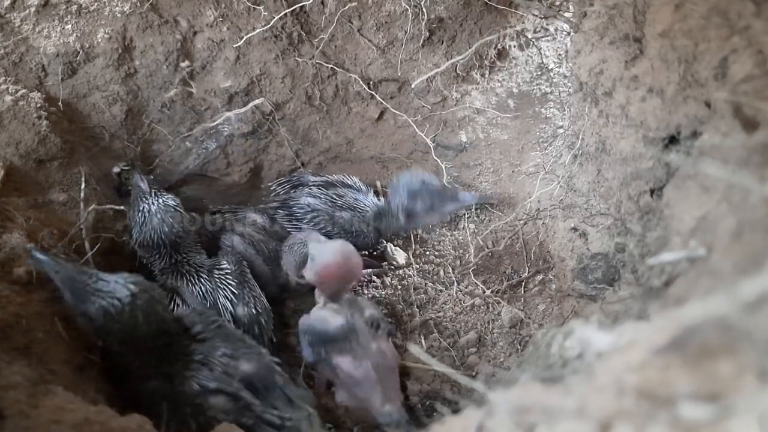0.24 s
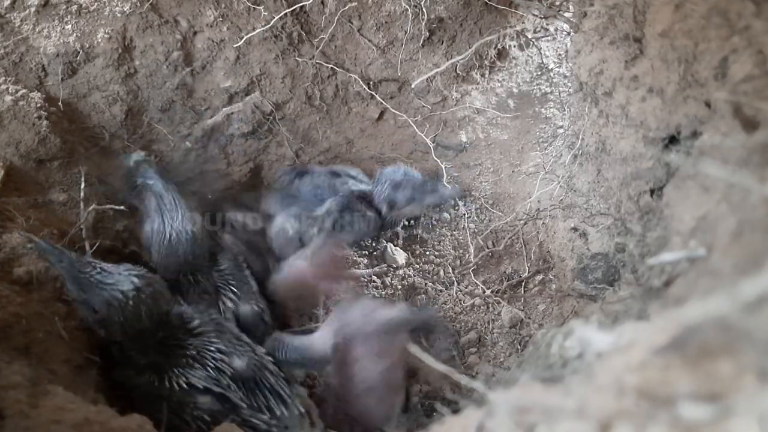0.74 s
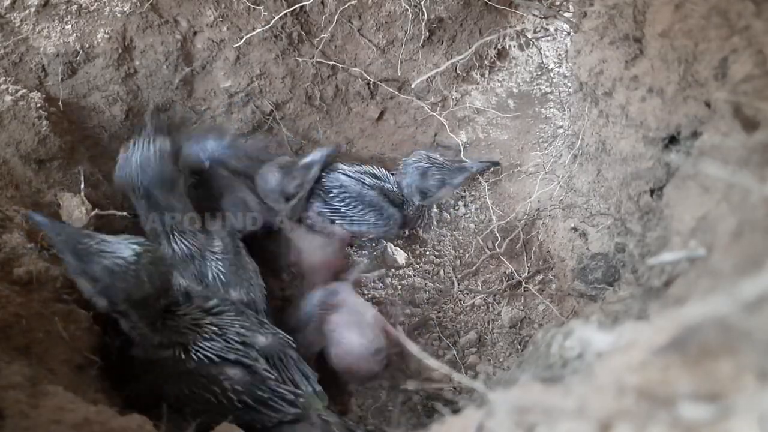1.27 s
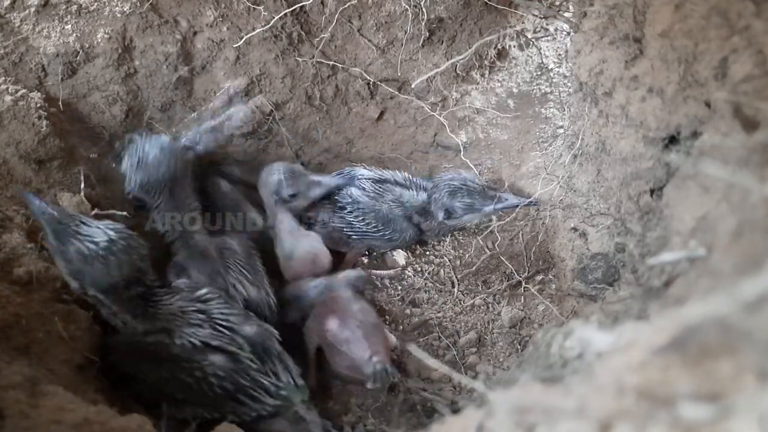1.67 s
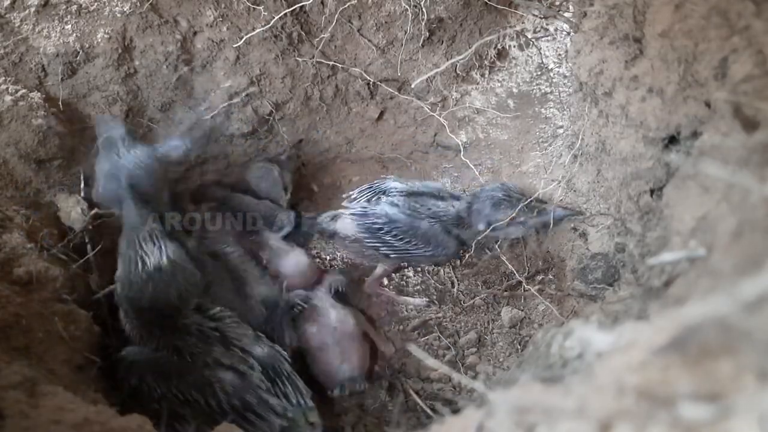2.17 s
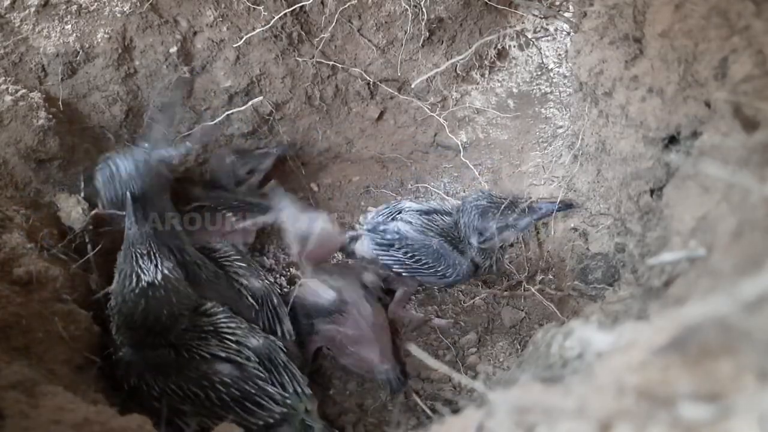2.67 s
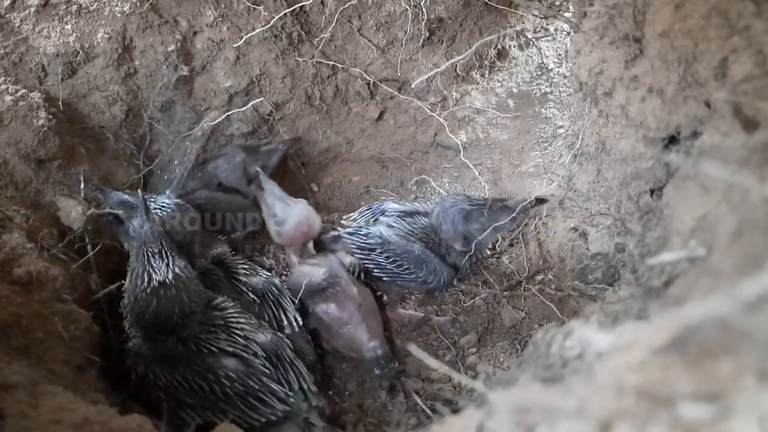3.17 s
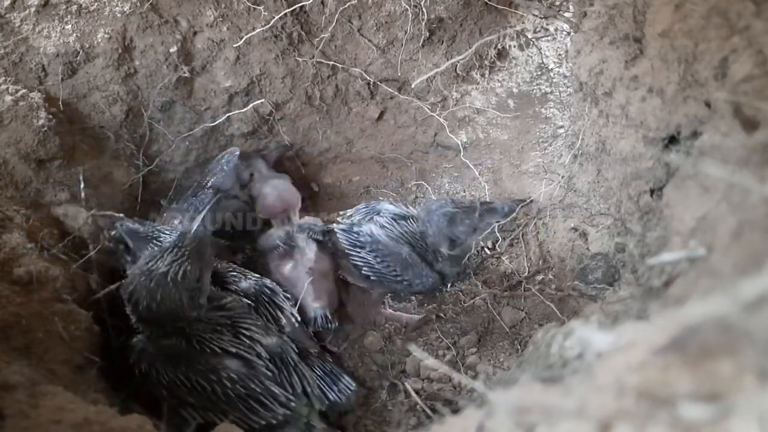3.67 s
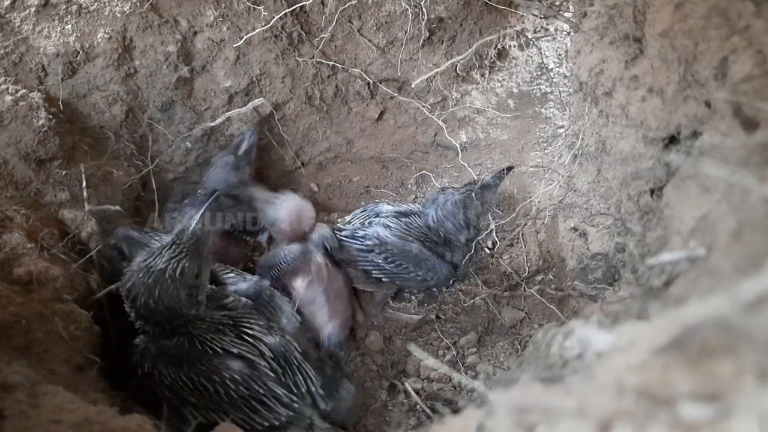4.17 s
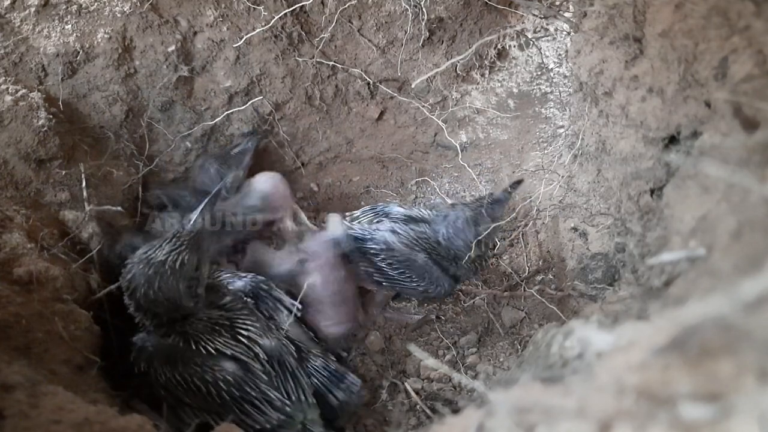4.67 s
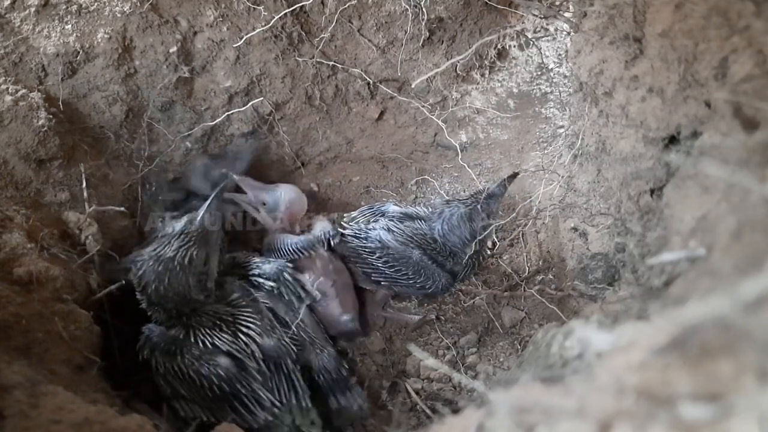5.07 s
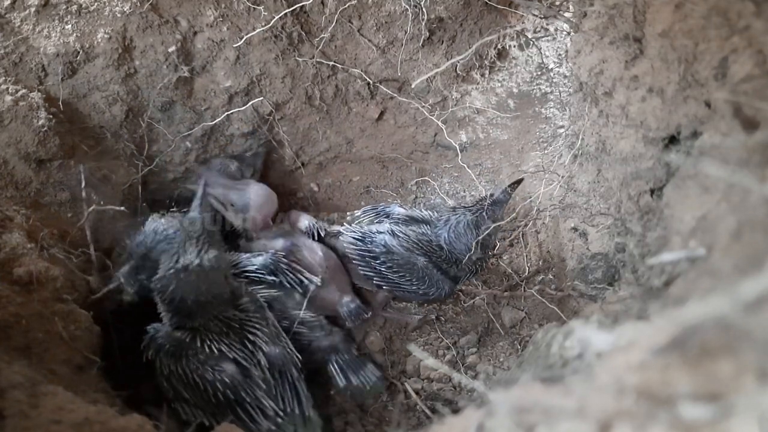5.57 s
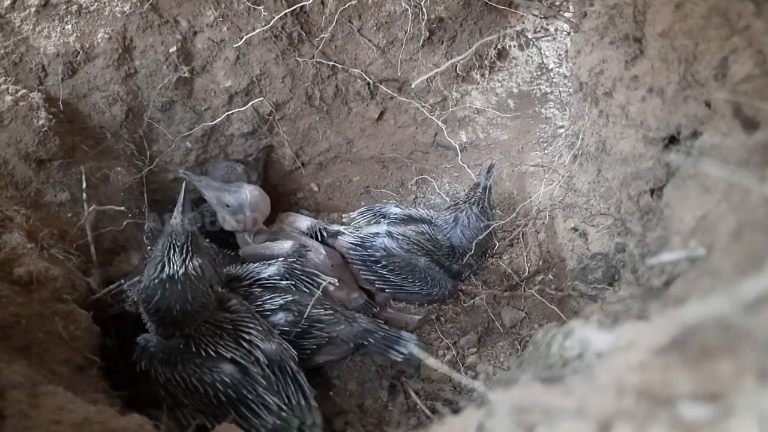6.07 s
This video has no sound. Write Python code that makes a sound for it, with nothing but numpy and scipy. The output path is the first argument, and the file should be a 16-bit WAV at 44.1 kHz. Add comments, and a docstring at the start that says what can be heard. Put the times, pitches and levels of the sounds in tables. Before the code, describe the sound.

A far motor's low hum and a faint hiss run steadily. About a second in, nestlings close by and slightly left start calling: short, arching chirps that sink into quick, rasping trills, overlapping and loudest near the end. Under the calls come gritty scuffles in dry dirt and occasional small claw or beak ticks. The earth walls of the burrow add a very short echo.

```python
"""Over a far motor's hum and a faint hiss, bee-eater chicks scuffle and beg, close by and a little left.
Each call is a chirp that arches up and down, then sinks into a fluttering, rasping trill.
The flutter comes from the syrinx, a bird's voice box; one voice is full, another thin and shrill.
Dry soil grates as the chicks push about, and the earth walls of their burrow add short echoes."""
import sys
import numpy as np
from scipy import signal
from scipy.fft import rfft, irfft, next_fast_len
from scipy.io import wavfile

SR = 44100
rng = np.random.default_rng(int(sys.argv[2]) if len(sys.argv) > 2 else 0)


def unload_wav(signal):
    """Save mono or channel-first audio to the path in sys.argv[1] as 16-bit WAV at rate SR, clipped to [-1, 1]."""
    wavfile.write(
        sys.argv[1],
        SR,
        np.round(np.clip(np.atleast_2d(signal).T, -1, 1) * 32767).astype(np.int16),
    )


N = 279153
TIME = np.arange(N) / SR
EAR_LAG_S = 0.0002   # the voices reach the right side this much later
CHIRP_START_HZ, CHIRP_END_HZ, PEEP_FOOT_HZ = 2816, 2570, 2570   # all near the pitch of the trills

# Arched chirps (harmonics are tones at 1, 2, 3... times the pitch): start_s, top_s, end_s, top_hz,
# swell_half_width_s, harmonic1_db, harmonic2_db, harmonic3_db, roughness (0 to 1), pan_db
CHIRP_NOTES = [(0.921, 0.935, .972, 2980, 0.032, -47.5, -49.5, -58, 0.5, 12),
               (1.2, 1.224, 1.29, 4055, 0.064, -40.5, -30, -40.5, .35, 8.3),
               (1.27, 1.295, 1.318, 3480, .013, -33.5, -45.5, -54, 0, 13),
               (1.542, 1.567, 1.6, 3610, 0.015, -35.5, -24, -39.5, 0.07, 7.9),
               (1.688, 1.721, 1.754, 3840, 0.03, -31, -40, -45, 0.1, 7.8),
               (1.843, 1.864, 1.894, 3540, 0.02, -35.5, -27, -32.5, 0, 8),
               (2.144, 2.162, 2.201, 3530, 0.0097, -32, -24, -37, .03, 10.6),
               (2.28, 2.308, 2.342, 3750, 0.035, -32, -50, -66, 0.1, 11),
               (2.434, 2.465, 2.492, 3450, 0.013, -33.5, -28.5, -47, 0, 8.2),
               (2.68, 2.712, 2.744, 3800, 0.036, -33.5, -60, -70, 0.2, 11),
               (2.697, 2.733, 2.769, 3650, 0.034, -31.5, -48.5, -68, 0.28, 7.6),
               (3.009, 3.03, 3.061, 3856, .012, -21.5, -43, -68, 0, 5.7),
               (3.289, 3.312, 3.337, 3510, 0.018, -32.5, -42, -71, 0.65, 11),
               (3.296, 3.32, 3.353, 3576, 0.012, -37, -17.5, -53, 0.33, 6.2),
               (3.651, 3.671, 3.705, 3280, 0.025, -33.5, -57, -87, 0.3, 8.9),
               (3.998, 4.018, 4.04, 3260, 0.02, -30, -49, -69, 0.7, 7.9),
               (4.066, 4.092, 4.124, 3460, 0.063, -32.5, -41, -64, 0.55, 2.7),
               (4.383, 4.409, 4.439, 3746, .009, -37, -17.3, -46, 0.64, 11),
               (4.491, 4.51, 4.528, 3380, .028, -29, -45, -59, 1, 7),
               (4.537, 4.535, 4.604, 4140, 0.12, -32.5, -55, -54, 0.58, 19),
               (4.662, 4.686, 4.715, 3260, 0.029, -37, -38, -35, 0.44, 12),
               (4.988, 5.018, 5.047, 3710, 0.0084, -34.5, -20.5, -48.5, 0.66, 12),
               (5.299, 5.336, 5.365, 3836, 0.0092, -30, -33.5, -58, 0, 15),
               (5.315, 5.333, 5.368, 3510, 0.033, -28.5, -37, -37.5, 0.1, 9.5),
               (5.631, 5.653, 5.687, 3330, 0.025, -25, -31.5, -51.5, 0.85, 6.5),
               (5.914, 5.938, 5.961, 3530, 0.039, -23.5, -46, -70, 0.18, 8),
               (5.966, 5.989, 6.02, 3550, 0.032, -23, -45, -68, 0.15, 8.8),
               (6.264, 6.292, 6.331, 3420, 0.036, -22, -43, -63, 0.67, 12)]
# Full voice: start_s, end_s, pitch_hz, flutter_depth, sag (share of pitch), tone_db, rasp_db, growth_db
FULL_TRILL_NOTES = [(0.963, 1.182, 2435, 0.4, 0.049, -47, -68, 0.5),
                    (1.312, 1.471, 2550, 0.77, 0.034, -39.5, -60, -16),
                    (1.743, 1.946, 2706, 0.56, 0.01, -36.5, -38.5, -0.5),
                    (1.941, 2.02, 2630, 0.42, 0.13, -28, -49, -2),
                    (2.331, 2.522, 2517, 0.88, 0.0013, -35, -36, -2),
                    (2.737, 3.24, 2690, 0.95, 0.0049, -43, -35, 0),
                    (3.329, 3.597, 2530, .65, 0.037, -36.5, -40, -6),
                    (3.687, 3.935, 2485, 1.1, 0.013, -37, -47.5, -4),
                    (4.036, 4.102, 2224, 0.36, 0, -37.5, -48.5, -9),
                    (4.586, 4.852, 2717, 1.15, .02, -35.5, -38, -3),
                    (5.358, 5.877, 2518, .8, 0.031, -29.5, -36, 0.5),
                    (5.957, 6.227, 2476, 0.83, 0.0027, -29, -41, -0.5)]
# Thin voice: start_s, end_s, pitch_hz, flutter_depth, harmonic2_db, harmonic3_db, growth_db, accent_db
THIN_TRILL_NOTES = [(.965, 1.174, 2486, 0.55, -58, -80, 3, 0),
                    (1.282, 1.475, 2840, 0.9, -44.5, -47.5, -4, -14),
                    (1.598, 1.77, 2744, 0.94, -44.5, -40, -8.5, 12.5),
                    (1.891, 2.063, 2650, 0.65, -43, -56, 34, -8),
                    (2.201, 2.363, 2630, 1.05, -46.5, -39, 10.5, -4),
                    (2.486, 2.628, 2660, 1.08, -45, -58, 5, -6),
                    (2.771, 2.934, 2600, 0.76, -50.5, -55, -2, -3),
                    (3.061, 3.219, 2650, 0.9, -42, -47.5, 9, 12.5),
                    (3.347, 3.478, 2666, .8, -47.5, -34, 2, -8),
                    (4.117, 4.309, 2740, 1.11, -51, -44, 6.5, 11),
                    (4.436, 4.588, 2820, 0.9, -48, -32.5, -7.5, -4),
                    (4.718, 4.911, 2560, 0.86, -51.5, -53, -10, 8),
                    (5.048, 5.234, 2690, 0.8, -48.5, -34.5, 7.5, 4),
                    (5.368, 5.552, 2720, 1, -47.5, -33, 0, -2), (5.681, 5.853, 2580, .8, -45, -65, -17, 13),
                    (6.017, 6.195, 2560, 0.95, -46.5, -56, -11, 2)]
# Squeaks as the shrill voice breaks into a chirp: start_s, level_db
SQUEAK_NOTES = [(1.534, -37), (1.836, -41), (2.139, -31), (3.291, -31), (4.378, -27)]
# Soft peeps between calls: start_s, end_s, top_hz, harmonic1_db, harmonic2_db
PEEP_NOTES = [(.005, 0.103, 2690, -63.5, -74), (1.785, 1.822, 2900, -48, -49),
              (2.092, 2.126, 2980, -47, -45.5), (2.651, 2.684, 2970, -39, -44.5),
              (2.949, 3.023, 3000, -43, -54), (3.234, 3.289, 3730, -53, -47),
              (3.598, 3.647, 3780, -47.5, -65), (3.94, 3.996, 3590, -47.5, -63),
              (4.933, 4.976, 2820, -49, -70), (5.856, 5.909, 3690, -37, -54),
              (6.228, 6.271, 3510, -42, -54.5)]
# Tone colour of a chick's rasp: frequency_hz, level_db
RASP_COLOUR = [(400, -26.5), (750, -38.5), (1000, -10.5), (1200, -7.5), (1750, -1), (2300, -3.5),
               (2900, -3.5), (3700, -17), (5000, -30), (8000, -75)]
# Tone colour of the air hissing in a chirp: frequency_hz, level_db
BREATH_COLOUR = [(1500, -25), (3500, -4), (6000, -17), (8500, 15), (11000, -15), (15500, -11)]
# Pushes against dry soil: start_s, length_s, level_db
SOIL_PUSHES = [(0, 0.11, -62), (0.736, 0.12, -59.5), (0.885, 0.33, -53.5), (1.213, 0.35, -44),
               (1.556, 0.31, -43.5), (1.827, 0.28, -39), (2.154, 0.3, -47), (2.452, 0.34, -49.5),
               (3.027, 0.29, -51.5), (3.458, 0.26, -52.5), (4.036, 0.11, -43.5), (4.2, 0.18, -43),
               (4.43, 0.28, -46.5), (4.672, 0.29, -46), (5.03, 0.39, -44), (5.477, 0.39, -50.5),
               (5.86, 0.21, -53.5), (6.27, .06, -58)]
# Ticks of claws and beaks: start_s, level_db
CLAW_AND_BEAK_TICKS = [(.909, -33.5), (1.012, -39), (1.0269, -30), (1.117, -41), (1.5035, -45),
                       (1.626, -28), (2.145, -32), (2.688, -42), (3.6433, -37), (4.005, -48),
                       (4.193, -26.5), (5.6308, -30)]
# Tone colour of grating soil: frequency_hz, level_db
SOIL_COLOUR = [(400, -13.5), (1000, 2.5), (2000, 3.5), (4000, 2.5), (6000, 4.5), (8000, 14), (10000, -3),
               (11300, -5), (12800, 5.5), (15500, -2.5)]
# The motor's humming tones: pitch_hz, level_db
MOTOR_TONES = [(75.6, -41.5), (151.2, -45.5), (226.8, -56.5)]
# Tone colour of the low rumble: frequency_hz, level_db
RUMBLE_COLOUR = [(22, -34), (40, -5), (52, -2.5), (70, -8.5), (100, 2.5), (135, -5.5), (180, -4),
                 (245, -4.5), (360, -22.5), (500, -30), (800, -34), (1500, -41), (4000, -54.5)]
# How alike the rumble is left and right: frequency_hz, likeness (0 to 1)
RUMBLE_STEREO = [(30, 0.61), (80, 0.64), (280, 0.78), (640, 0.085), (1400, 0), (16000, 0)]
# Tone colour of the background hiss: frequency_hz, level_db
HISS_COLOUR = [(1760, -82), (3000, -13), (3380, -35), (4340, -17.5), (5090, 4.5), (5380, -6.5), (5850, 7),
               (6450, 1.5), (8690, -1), (9320, -52), (10100, -40), (11700, -25.5), (15800, -30)]


def chirps(fade_s=.0026, rough_waver=.06, ripple_db=2.8, air_db=-16, rasp_db=-20):
    """The pitch arches up and down; at the top the forced voice swells and can turn rough."""
    out, air, rasp = np.zeros((2, N)), np.zeros((2, N)), np.zeros((1, N))
    floors = (.28, .09, .6, .6)   # each harmonic's strength outside the swell
    for start, top, end, top_hz, width, *levels_db, rough, pan_db in CHIRP_NOTES:
        t, gate = span(start - fade_s / 2, end + fade_s / 2, fade_s)
        rising = np.clip((t - start) / max(top - start, .001), 0, 1)
        falling = np.clip((t - top) / (end - top), 0, 1)
        rise_hz = CHIRP_START_HZ + (top_hz - CHIRP_START_HZ) * np.sin(np.pi / 2 * rising)
        fall_hz = CHIRP_END_HZ + (top_hz - CHIRP_END_HZ) * np.cos(np.pi / 2 * falling) ** 2
        swell = np.exp(-np.abs((t - top) / width) ** 2.95)
        jitter = 0.0037 * drift(422, len(t)) + 0.014 * drift(4000, len(t))
        jitter += rough * rough_waver * swell * drift(2000, len(t))
        hz = np.where(t < top, rise_hz, fall_hz) * (1 + jitter)
        high_pan_db = pan_db + 5   # higher harmonics sound further left
        fourth_db = levels_db[-1] - 2
        for k, (level_db, floor) in enumerate(zip(levels_db + [fourth_db], floors), 1):
            shape = unit_power(gate * (floor + swell) * from_db(ripple_db * drift(234.6, len(t))))
            fray = 0.038 * (k > 2) * drift(3000, len(t))   # the top harmonics blur into hiss
            tone = whistle(k * hz * (1 + fray), high_pan_db if k > 1 else pan_db)
            add(out, t, from_db(level_db) * shape * tone)
        # shriller chirps let out more air; rougher ones rasp more
        add(air, t, from_db(levels_db[-1] + air_db) * gate * pan(high_pan_db))
        add(rasp, t, from_db(levels_db[0] + rasp_db) * rough * gate * swell)
    return out + air * noise(BREATH_COLOUR) + rasp * rasp_noise(pan_db=8.5)


def full_trills(pan_db=5.5, octave_db=-23, uneven_db=2.5, rattle_db=1.5, rasp_fade_s=.018):
    """The full voice: a throbbing tone, with a rasp that bursts out between throbs and clears at last."""
    out, bursts = np.zeros((2, N)), np.zeros((1, N))
    for start, end, pitch_hz, depth, sag, tone_db, rasp_db, growth_db in FULL_TRILL_NOTES:
        t, gate = span(start, end, fade_s=0.0041)
        effort = gate * from_db(growth_db * np.linspace(-.5, .5, len(t)))
        hz, shut = flutter(t, pitch_hz, depth, sag, rate_hz=114, slide=.33, scatter=0.0417)
        throb = unit_power((1 - shut) * from_db(uneven_db * drift(88.2, len(t))))
        tone = whistle(hz, pan_db) + from_db(octave_db) * whistle(2 * hz, pan_db)
        add(out, t, effort * from_db(tone_db) * throb * tone)
        rattle = unit_power((0.42 + shut) * from_db(rattle_db * drift(250, len(t))))
        add(bursts, t, effort * from_db(rasp_db) * rattle * np.clip((end - t) / rasp_fade_s, 0, 1))
    return out + dip(bursts * rasp_noise(pan_db=7), hz=3300, depth_db=3.5, q=3.7)


def thin_trills(pan_db=9, rasp_db=-12, climb=0.0405, accent_s=0.0062):
    """The thin voice: a small throat favours harmonics 2 and 3, and sounds brighter with effort."""
    out, bursts = np.zeros((2, N)), np.zeros((1, N))
    for start, end, pitch_hz, depth, second_db, third_db, growth_db, accent_db in THIN_TRILL_NOTES:
        t, gate = span(start, end, fade_s=0.0025)
        progress = np.linspace(0, 1, len(t))
        end_accent = np.exp(-((end - t) / accent_s - 1) ** 2)
        effort_db = growth_db * (progress - .5) + accent_db * end_accent
        scatter = 0.037 + 0.074 * progress ** 2   # rougher as the note goes on
        hz, shut = flutter(t, pitch_hz, depth, sag=0.058, rate_hz=98, slide=0.092, scatter=scatter)
        hz = hz * (1 + climb * (progress - .5))
        opening = np.clip(1 - 0.82 * shut, .15, 1)
        throb = gate * unit_power(opening * from_db(1.5 * drift(130.8, len(t))))
        low_db, high_db = second_db + 0.34 * effort_db, third_db + effort_db
        for k, level_db in enumerate((low_db - 4, low_db, high_db, high_db - 27, high_db - 27), 1):
            add(out, t, from_db(level_db) * throb * whistle(k * hz, pan_db))
        add(bursts, t, from_db(high_db + rasp_db) * gate * shut * 2 * np.sqrt(progress))
    return out + bursts * rasp_noise(pan_db)


def flutter(t, pitch_hz, depth, sag, rate_hz, slide, scatter, drop_s=0.00883, clear_s=0.0247):
    """The voice box throbs, each throb sliding down and breaking up. Gives pitch and how shut it is."""
    cycle = np.cumsum(rate_hz * (1 + 0.0633 * drift(60.3, len(t)))) / SR + rng.random()
    depth = depth * np.clip(2 * (t[-1] - t) / clear_s - 1, 0, 1)   # throbbing stops before the end
    shut = np.clip(depth * np.cos(np.pi * cycle) ** 2, 0, 1)
    early_sag = sag * np.sin(np.pi * np.linspace(0, 1, len(t)) ** .7) ** 2
    end_drop = 0.204 * np.exp((t - t[-1]) / drop_s)
    throb_drop = slide * depth * (cycle % 1) ** 3
    jitter = scatter * (0.39 * depth + shut) * drift(1500, len(t)) + 0.0128 * drift(44.43, len(t))
    return pitch_hz * (1 - early_sag - end_drop - throb_drop + jitter), shut


def rasp_noise(pan_db):
    """The low, noisy rasp in a chick's voice."""
    left = noise(RASP_COLOUR)[0]
    right = np.interp(TIME - EAR_LAG_S, TIME, left)
    return np.array([left, right]) * pan(pan_db)


def squeaks(length_s=0.0091, from_hz=4000, to_hz=3430, pan_db=14):
    """The voice breaks in a brief falling squeak, strongest in its second harmonic."""
    out = np.zeros((2, N))
    for start, level_db in SQUEAK_NOTES:
        t, gate = span(start, start + length_s, fade_s=0.0017)
        hz = np.linspace(from_hz, to_hz, len(t)) * (1 + 0.027 * drift(1900, len(t)))
        tone = from_db(-19) * whistle(hz, pan_db) + whistle(2 * hz, pan_db)
        add(out, t, from_db(level_db) * gate * tone)
    return out


def peeps(pan_db=4, waver=0.018):
    """Soft whistles that rise and bend over at the top."""
    out = np.zeros((2, N))
    for start, end, top_hz, *levels_db in PEEP_NOTES:
        t, gate = span(start, end, fade_s=.009)
        arch_hz = top_hz - (top_hz - PEEP_FOOT_HZ) * np.linspace(-1, .6, len(t)) ** 2
        hz = arch_hz * (1 + waver * drift(1200, len(t)))
        for k, level_db in enumerate(levels_db, 1):
            add(out, t, from_db(level_db) * gate * whistle(k * hz, pan_db))
    return out


def scuffle(rest_db=-72, weaken_db=2.5, grain_db=2.5, clump_db=3.5, release_s=0.09, tick_s=0.003):
    """Crumbs of soil grate in clumps each time a chick pushes; now and then a claw or beak ticks."""
    effort, ticks = np.full((1, N), from_db(rest_db)), np.zeros((1, N))
    for start, length, level_db in SOIL_PUSHES:
        t, gate = span(start, start + length, fade_s=0.018)
        release = np.clip((t[-1] - t) / release_s, 0, 1)
        add(effort, t, from_db(level_db - weaken_db * (t - start) / length) * gate * release)
    for start, level_db in CLAW_AND_BEAK_TICKS:
        t, gate = span(start, start + 0.018, fade_s=0.00077)
        add(ticks, t, from_db(level_db) * gate * np.exp((start - t) / tick_s))
    grains = unit_power(from_db(grain_db * drift(900, N) + clump_db * drift(70, N)))
    soil = noise(SOIL_COLOUR) * pan(pan_db=8)
    keep_treble = signal.butter(1, 3500, "high", fs=SR, output="sos")
    return effort * grains * soil + ticks * signal.sosfilt(keep_treble, soil)


def burrow(x, echo_db=-15, die_away_s=.11):
    """Close earth walls return a short, dense smear of echoes."""
    t = TIME[:SR // 8]
    echoes = rng.standard_normal((2, len(t))) * from_db(-60 * t / die_away_s) * (t > .0015)
    echoes /= np.sqrt(np.sum(echoes ** 2, axis=1, keepdims=True))
    return x + from_db(echo_db) * signal.fftconvolve(x, echoes, axes=1)[:, :N]


def motor(waver=0.00584, flicker_db=2.5, rumble_db=-43, rise_db_per_s=0.46):
    """A far motor: three wavering tones slowly grow louder over a steady low rumble."""
    wavering_time = np.cumsum(1 + waver * drift(3.6, N)) / SR
    hum = np.zeros(N)
    for hz, level_db in MOTOR_TONES:
        gain = from_db(level_db + flicker_db * drift(12, N))
        hum += gain * np.sqrt(2) * np.sin(2 * np.pi * (hz * wavering_time + rng.random()))
    hum *= from_db(rise_db_per_s * (TIME - TIME.mean()))
    return hum + from_db(rumble_db) * noise(RUMBLE_COLOUR, RUMBLE_STEREO) * pan(pan_db=2.5)


def hiss(level_db=-53, pan_db=-5.5):
    """A faint, steady high hiss, a little to the right."""
    return from_db(level_db) * noise(HISS_COLOUR) * pan(pan_db)


def whistle(hz, pan_db):
    """A pure gliding tone that reaches the right side a little later."""
    cycles = np.cumsum(hz) / SR + rng.random() - hz * EAR_LAG_S * np.array([[0], [1]])
    return np.sqrt(2) * np.sin(2 * np.pi * cycles) * pan(pan_db)


def noise(colour, likeness=((20, 0), (20000, 0))):
    """Steady stereo noise of a given tone colour, with power 1."""
    size = next_fast_len(N)
    hz = np.arange(size // 2 + 1) * SR / size
    shared, opposed = rfft(rng.standard_normal((2, size))) * from_db(at_hz(colour, hz))
    alike = np.clip(at_hz(likeness, hz), -1, 1)
    spectrum = np.sqrt(1 + alike) * shared + np.sqrt(1 - alike) * opposed * [[1], [-1]]
    return unit_power(irfft(spectrum, size)[:, :N])


def drift(rate_hz, size):
    """A random wander, about 1 either way, that turns about rate_hz times a second."""
    points = rng.standard_normal(size // 8 + 4)
    return 1.208 * np.interp(np.arange(size) * rate_hz / SR, np.arange(len(points)), points)


def dip(x, hz, depth_db, q):
    """Turn down the frequencies around hz; a higher q makes the dip narrower."""
    b, a = signal.iirpeak(hz, q, fs=SR)
    return x - (1 - from_db(-depth_db)) * signal.lfilter(b, a, x + 1e-18)


def at_hz(table, hz):
    """Read between a table's rows, with the octaves evenly spaced."""
    row_hz, values = np.transpose(table)
    return np.interp(np.log(np.maximum(hz, 1)), np.log(row_hz), values)


def span(start, end, fade_s):
    """The times of a sound, and a gate: a gain that fades it in and out."""
    t = TIME[int(start * SR):int(end * SR)]
    to_edge_s = np.minimum(t - t[0], t[-1] - t)
    return t, np.sin(np.pi / 2 * np.clip(to_edge_s / fade_s, 0, 1)) ** 2


def add(out, t, sound):
    """Mix a sound in at its times."""
    first = int(round(t[0] * SR))
    out[:, first:first + len(t)] += sound


def pan(pan_db):
    """Two gains that make the left side pan_db louder than the right."""
    return unit_power(from_db(np.array([[.5], [-.5]]) * pan_db))


def from_db(db):
    """Turn decibels into a gain to multiply by."""
    return 10 ** (np.asarray(db) / 20)


def unit_power(x):
    """Scale to an average power of 1."""
    return x / np.sqrt(np.mean(x ** 2) + 1e-20)


def scene():
    """The chicks in their burrow, with the motor and the hiss behind them."""
    voices = chirps() + squeaks() + peeps() + full_trills() + thin_trills()
    voices = dip(voices, hz=10620, depth_db=10, q=4.9)
    return burrow(voices + scuffle()) + motor() + hiss()


def record(dry):
    """The highest treble, above 15850 Hz, is cut steeply."""
    return signal.sosfilt(signal.ellip(10, .2, 80, 15850, fs=SR, output="sos"), dry)


dry = scene()
out = record(dry)
unload_wav(out)
```